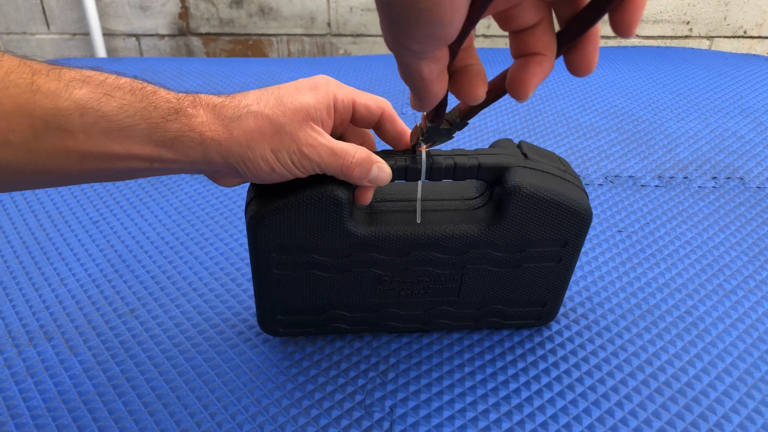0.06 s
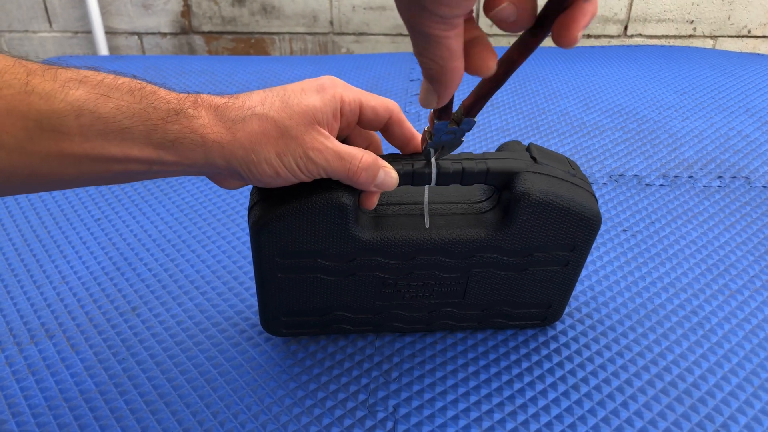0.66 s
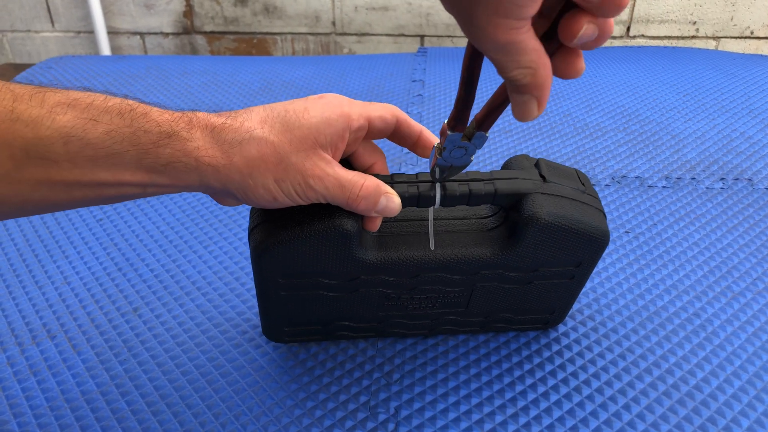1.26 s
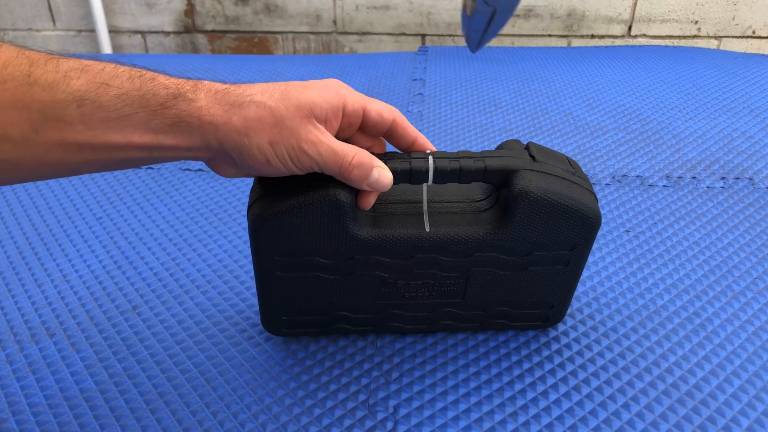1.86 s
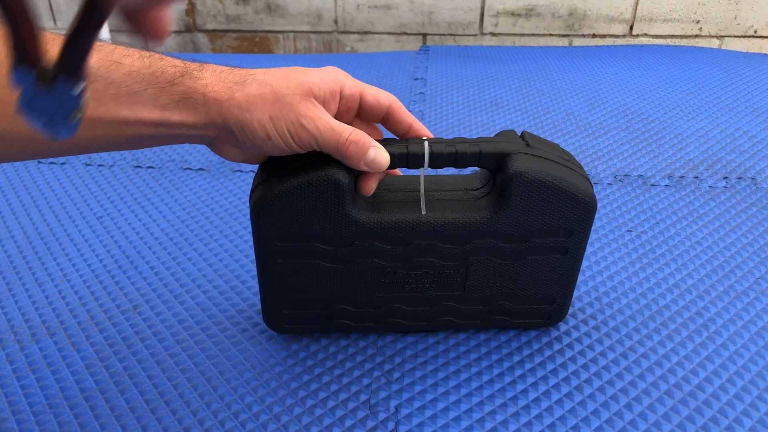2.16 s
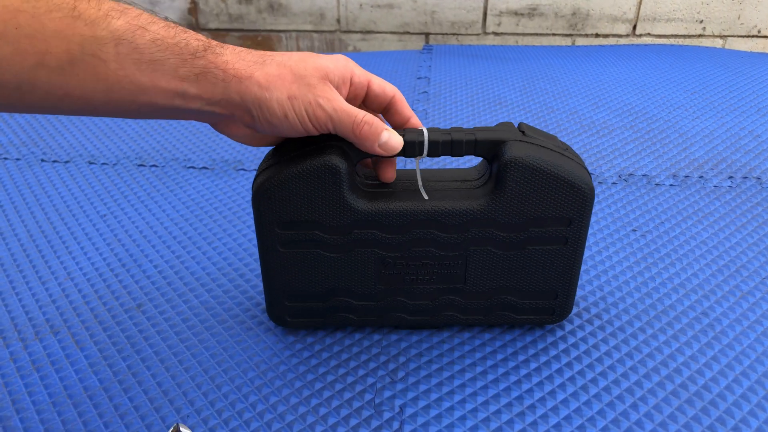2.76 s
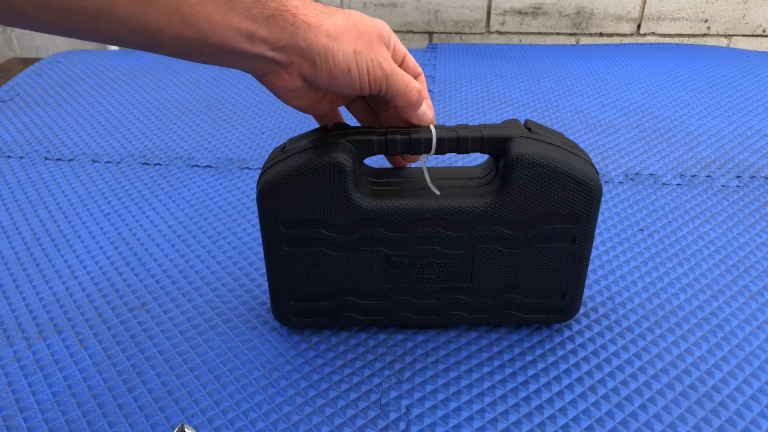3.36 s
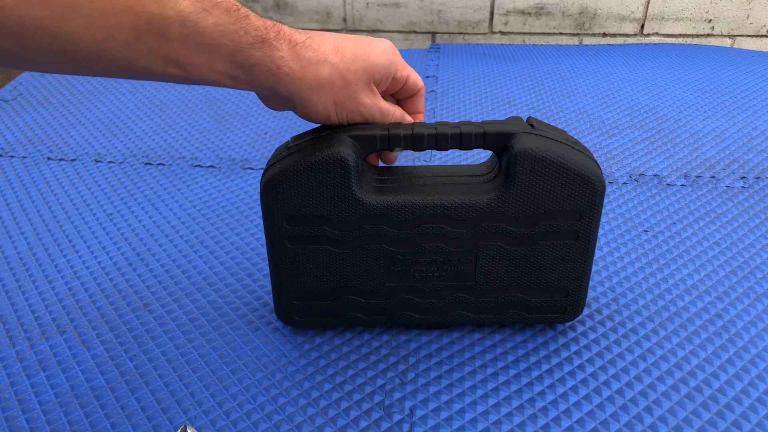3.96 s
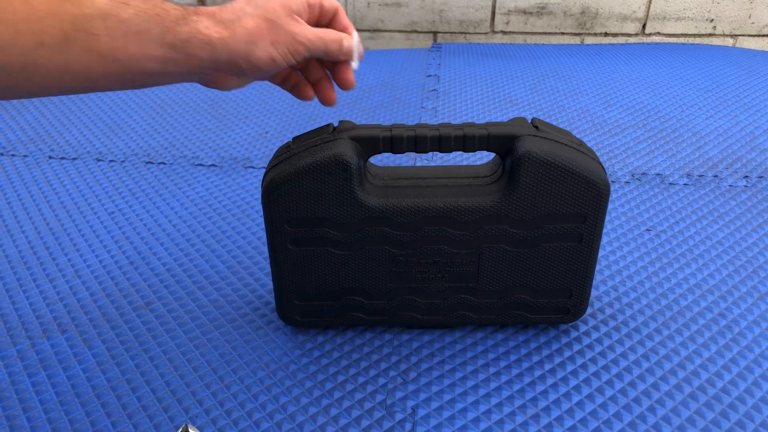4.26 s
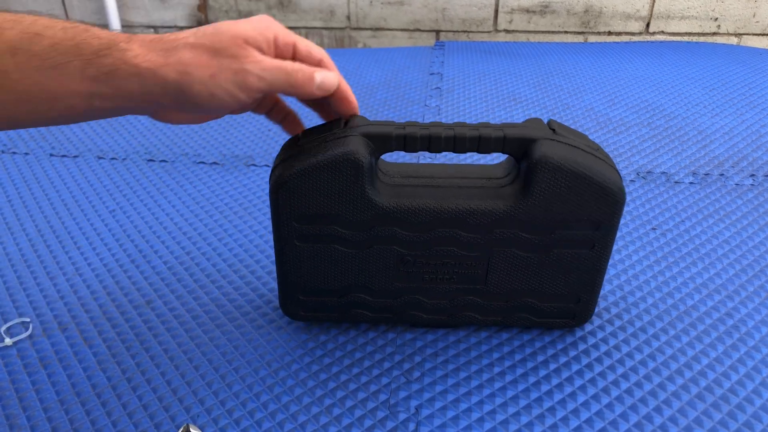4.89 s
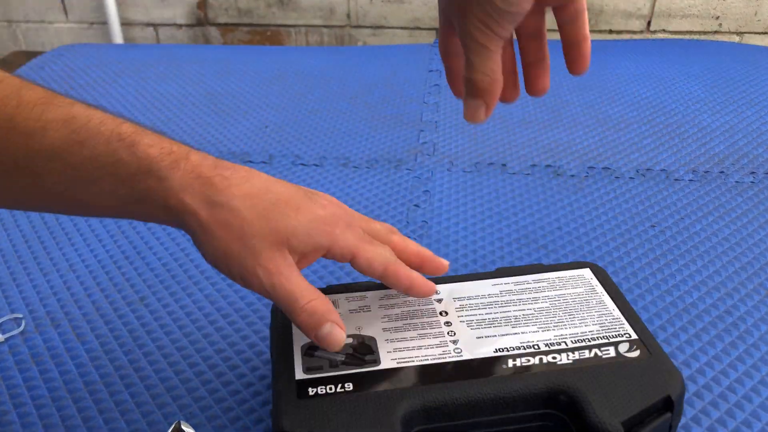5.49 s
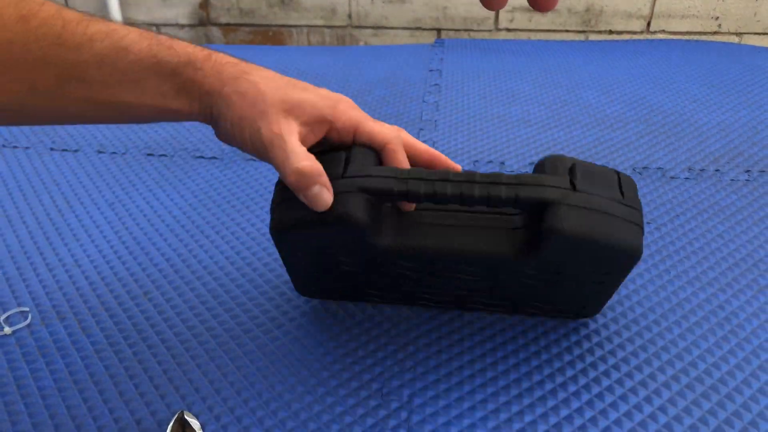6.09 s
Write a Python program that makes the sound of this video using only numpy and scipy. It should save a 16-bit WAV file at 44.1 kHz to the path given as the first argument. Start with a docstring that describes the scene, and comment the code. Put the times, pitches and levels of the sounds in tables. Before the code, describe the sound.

In a small, quiet room, faint creaks and ticks lead to a sharp crack as cutters snip a zip tie on a plastic tool case. The cutters scrape and knock down onto a foam mat. The tie clicks out of the handle and bounces away lightly. The case then tips over with a loud hollow thump, and a hand slides softly across it. Everything sounds close to the microphone.

```python
"""Faint creaks and ticks sound in a small hard-walled room as diagonal cutters grip a zip tie on a hollow
plastic tool case. The nylon parts with a crack and the steel jaws ring. The cutters scrape down onto a
foam mat; the tie clicks out of the handle and is tossed aside, where it bounces. The case tips over on
the mat, its shell booming in many modes, and a hand slides over its lid with a hiss and lifts it."""
import sys
import numpy as np
from scipy import signal
from scipy.fft import rfft, irfft, next_fast_len
from scipy.io import wavfile
from scipy.ndimage import uniform_filter1d, minimum_filter1d

SR = 44100
rng = np.random.default_rng(int(sys.argv[2]) if len(sys.argv) > 2 else 0)


def file_out(sig):
    """Save sig as 16-bit WAV at sys.argv[1]."""
    # one column per channel
    cols = np.atleast_2d(sig).T
    # limit, then scale
    lim = np.clip(cols, -1, 1)
    pcm = np.round(lim * 32767).astype(np.int16)
    wavfile.write(sys.argv[1], SR, pcm)


N = 270421
T = np.arange(SR) / SR  # one second of time [s]


def amp(db):
    """Amplitude ratio of a level: a factor of ten per 20 dB."""
    return 10 ** (np.asarray(db) / 20)


def unit(x):
    """Normalisation to rms 1."""
    return x / np.sqrt(np.mean(x ** 2) + 1e-20)


def along(points, hz):
    """Interpolation of (frequency [Hz], value) points on a logarithmic frequency axis."""
    f, v = np.transpose(points)
    return np.interp(np.log(hz + 1), np.log(f + 1), v)


def fade(t60):
    """Exponential damping, one second long, falling 60 dB in t60 seconds."""
    return np.exp(-np.log(1000) * T / np.maximum(t60, 1e-4))


def add(track, s, sound):
    """Superposition: a sound joins the track at s seconds."""
    part = track[max(round(s * SR), 0):][:len(sound)]
    part += sound[:len(part)]


def coloured(x, spectrum, tilt_db=0):
    """Minimum-phase filtering to a spectrum, tilted by tilt_db per octave above 500 Hz."""
    size = 2 * next_fast_len(len(x) // 2 + 4096)
    hz = np.fft.rfftfreq(size, 1 / SR)
    gain_db = along(spectrum, hz) + tilt_db * np.log2(np.maximum(hz, 500))
    cepstrum = irfft(np.log(amp(gain_db)))
    cepstrum[1:size // 2] *= 2  # folding onto positive time makes the filter causal
    cepstrum[size // 2 + 1:] = 0
    return irfft(rfft(x, size) * np.exp(rfft(cepstrum)))[:len(x)]


def walls():
    """Room impulse response of energy 1: after 11 ms a diffuse tail, whose bass is absorbed slowest."""
    # reverberation time: (frequency [Hz], t60 [s])
    decay_times = [(100, 0.44), (500, 0.24), (2000, 0.29), (6000, 0.28), (10000, 0.21), (15000, 0.32)]
    hz, t, noise = signal.stft(rng.standard_normal(SR // 2), SR, nperseg=256)
    decay = np.exp(-np.log(1000) * t / along(decay_times, hz)[:, None])
    tail = signal.istft(noise * decay, SR, nperseg=256)[1]
    return np.pad(tail / np.linalg.norm(tail), (round(.011 * SR), 0))


def in_room(x, wet_db):
    """Reverberation: the direct sound plus its convolution with the room's response."""
    out = amp(wet_db) * signal.fftconvolve(x, walls())
    add(out, 0, x)
    return out


def crack(spectrum, t60, wet_db, tilt_db=0):
    """Impact transient: a damped noise burst and its reverberation, filtered at constant energy."""
    envelope = fade(t60)
    burst = amp(wet_db) * np.linalg.norm(envelope) * walls()
    add(burst, 0, envelope * rng.standard_normal(SR))
    sound = coloured(burst, spectrum, tilt_db)
    return sound * np.linalg.norm(burst) / np.linalg.norm(sound)


def ring(modes, attack_s):
    """Free vibration: a sum of damped modes, at slightly new strengths for every blow."""
    tones = sum(amp(db + rng.standard_normal()) * fade(t60) * np.sin(2 * np.pi * hz * T)
                for hz, db, t60 in modes)
    return tones * (1 - fade(attack_s))


def slips(spectrum, uneven_db, tilt_db):
    """Friction noise: one second of tiny dense slips of uneven size, rms 1."""
    sizes = amp(uneven_db * np.repeat(rng.standard_normal(SR), 24)[:SR])
    return unit(coloured(sizes * rng.standard_normal(SR), spectrum, tilt_db))


def room_tone():
    """Stationary background noise: a low rumble under faint hiss."""
    # spectrum of the quiet room: (frequency [Hz], density [dB])
    air = [(12, -49), (20, -2), (120, -2.5), (146, -7.5), (277, -11), (357, -20.5), (399, -20), (513, -21),
           (825, -22.5), (976, -23.5), (1060, -28), (2670, -37), (5680, -37), (12400, -48.5), (16000, -69)]
    return amp(-48.5) * unit(coloured(rng.standard_normal(N + SR), air)[SR:])


def creaks():
    """Stick-slip friction: sparse catches excite one resonance during a short stroke."""
    # creaks of fingers, tie and case: (midpoint [s], length [s], level [dB], resonance [Hz])
    events = [(0.088, .1, -48, 660), (1.078, .081, -60, 4800), (2.819, .03, -53, 1015),
              (3.332, .12, -56.5, 1100), (3.867, .045, -44.5, 900), (3.868, .05, -42, 2350)]
    catches_per_s = 250
    out = np.zeros(N)
    for s, length, db, hz in events:
        catches = (rng.random(SR) < catches_per_s / SR) * rng.standard_normal(SR)
        body = [(hz * .14, -28), (hz * .66, -8), (hz, 0), (hz * 1.3, -8), (hz * 3, -28), (hz * 9, -45)]
        stroke = np.sin(np.pi * np.minimum(T / length, 1))
        add(out, s - length / 2, amp(db) * stroke * unit(coloured(catches, body)))
    return in_room(out, wet_db=-6)


def ticks():
    """Impulse excitation: each light contact sounds one broad resonance."""
    # tie in the jaws, tool on the case, strap flicking the handle, tie bouncing on the floor:
    # (time [s], level [dB], resonance [Hz])
    contacts = [(.149, -44, 686), (.611, -39.5, 4200), (.624, -44.5, 4150), (.641, -45, 4100),
                (.657, -36, 3860), (1.626, -49.5, 2860), (2.681, -26, 2280), (2.918, -48, 2690),
                (3.036, -42, 2850), (3.745, -37, 1000), (3.9343, -21, 2050), (3.935, -20, 740),
                (4.5377, -27, 3080), (4.597, -32, 3060), (4.6754, -44, 3200), (4.7432, -36.5, 3100)]
    out = np.zeros(N)
    for s, db, hz in contacts:
        body = [(hz * .21, -32), (hz * .6, -7), (hz, 0), (hz * 1.24, -4), (hz * 1.4, -17),
                (hz * 3, -24), (16000, -39)]
        add(out, s, amp(db - 2.5) * crack(body, t60=.019, wet_db=-10.5))
    return out


def taps():
    """Hard impact: brief contact between stiff parts spreads energy over a wide band."""
    # taps and rattles of case and cutters: (time [s], level [dB], t60 [s], tilt [dB/octave])
    impacts = [(.3589, -31, 0.023, 5.5), (.376, -39.5, 0.02, 1.5), (1.44, -45.5, .028, -2),
               (1.458, -45, 0.023, 1), (2.152, -44.5, 0.032, -0.5), (2.489, -30, .018, 1.5),
               (2.546, -15.5, 0.041, -3), (2.559, -10, 0.013, -3), (2.680, -27, 0.015, -6.5),
               (3.494, -34.5, .018, 1), (3.863, -33, .029, -5), (3.8905, -20.5, 0.0187, 3),
               (3.9125, -28, .014, 10), (3.933, -22, 0.039, -5), (4.052, -40, 0.043, -1),
               (5.132, -44, .039, .5), (5.393, -46.5, 0.018, 7), (5.3128, -12, 0.025, -0.1),
               (5.326, -28.5, 0.031, 4.5), (5.354, -34.5, .023, 4.5), (5.4095, -24, 0.011, 1.5),
               (5.603, -42, 0.022, -4)]
    # spectrum of a tap: (frequency [Hz], density [dB])
    spectrum = [(200, -14), (600, -14.5), (1000, -6.5), (1500, -10), (2300, 2), (3300, 4), (4500, -7.5),
                (6000, -9), (10000, -13.5), (15000, -33)]
    out = np.zeros(N)
    for s, db, t60, tilt_db in impacts:
        add(out, s, amp(db - 3.5) * crack(spectrum, t60, wet_db=-12.5, tilt_db=tilt_db))
    return out


def case_blows():
    """Modal response: a blow booms the hollow shell and clatters its panels; the foam adds a thud."""
    # blows on shell and mat: (time [s], boom [dB], clatter [dB], thud [dB])
    blows = [(.360, -52, -37.5, -70), (1.186, -32.5, -41, -47.5), (1.387, -55, -40, -68),
             (2.502, -49, -57, -26), (2.547, -31.5, -24, -49), (2.563, -29.5, -23, -18.5),
             (2.684, -29.5, -37, -24), (5.315, -2, -10, -12), (5.339, -36, -32, -19),
             (5.39, -49, -23.5, -48), (5.412, -22, -22, -24.5), (5.604, -46, -38.5, -42),
             (5.666, -43, -35, -35)]
    # modes of the shell: (frequency [Hz], level [dB], t60 [s])
    shell = [(102.1, -15.5, .66), (155.8, -14.5, .18), (196.9, -5.5, 0.13), (221.6, 2.5, 0.089),
             (291, -8.5, 0.11), (327.4, -17.5, 0.15), (394, -21, .18), (512, -26, 0.067), (574, -26.5, .26),
             (744.4, -29.5, 0.27), (898, -27, 0.281), (1040, -35, 0.46), (1326, -35.5, 0.25),
             (1640, -19.5, 0.1)]
    # clatter spectrum of the stiff panels: (frequency [Hz], density [dB])
    panels = [(120, -5), (280, -9), (450, 1), (900, -2), (1600, -9.5), (2300, -12), (4000, -31.5),
              (9000, -41)]
    # modes of the foam mat under a landing weight: (frequency [Hz], level [dB], t60 [s])
    mat = [(33, -17.5, 0.83), (52, -12.5, .43), (71.5, -3.5, .33), (82, -2, 0.22), (106.6, -8.5, 0.22),
           (151.6, -4.5, 0.17)]
    out = np.zeros(N)
    for s, boom_db, clatter_db, thud_db in blows:
        add(out, s, amp(boom_db) * in_room(ring(shell, attack_s=.017), wet_db=-14.5))
        add(out, s, amp(clatter_db - 3.5) * crack(panels, t60=.038, wet_db=-6))
        add(out, s, amp(thud_db) * ring(mat, attack_s=.045))
    return out


def tie_clicks():
    """Shock excitation: nylon teeth catch on edges and set the handle and the strap ringing."""
    # clicks against jaws and handle: (time [s], level [dB], t60 [s], tilt [dB/octave])
    clicks = [(.5944, -41.5, 0.021, 2), (.6473, -36, 0.014, -1), (.737, -39.5, .023, -5),
              (1.912, -42, .025, -2), (3.0229, -37.5, .029, -1.5), (3.072, -38, .016, -1),
              (3.6083, -9.5, 0.015, .5), (3.6166, -17.5, .014, -2), (3.8902, -21.5, 0.025, .5),
              (3.9116, -21.5, .01, 0.5), (3.926, -18.5, .018, 6.5), (3.933, -13, .038, -1)]
    # spectrum of a click: (frequency [Hz], density [dB])
    spectrum = [(100, -21), (300, -32), (600, -5.5), (1000, 2), (1350, -7.5), (1700, -3.5), (2300, -18),
                (3200, -1), (3900, -15), (4350, -10), (4900, -7), (5500, -5.5), (7700, -8.5), (9700, -3),
                (11800, -8.5), (13000, -2.5), (14300, -13.5), (15500, -25)]
    # modes of the hollow handle: (frequency [Hz], level [dB], t60 [s])
    handle = [(894, -16, 0.031), (1748, -28, 0.11)]
    # modes of the stiff strap: (frequency [Hz], level [dB], t60 [s])
    strap = [(1740, -16.5, 0.032), (3200, -19, 0.022), (4280, -16, 0.027), (5480, -11, 0.026),
             (5900, -19, 0.059), (8650, -21, .04), (9640, -12, 0.017), (11200, -14.5, .025)]
    out = np.zeros(N)
    for s, db, t60, tilt_db in clicks:
        add(out, s, amp(db - 7) * crack(spectrum, t60, wet_db=-12.5, tilt_db=tilt_db))
        add(out, s, amp(db - 4.5) * ring(handle, attack_s=.0032))
        add(out, s, amp(db - 6.5) * in_room(ring(strap, attack_s=.001), wet_db=-10))
    return out


def cut():
    """Fracture: the strap releases its strain at once and quivers, while the jaws clash and ring."""
    # the tie parts, then its loose end whips the handle: (time [s], level [dB], t60 [s])
    snaps = [(1.1726, 3.5, 0.0088), (1.2091, -10.5, 0.0035)]
    # spectrum of a snap: (frequency [Hz], density [dB])
    spectrum = [(300, -34.5), (600, -23.5), (950, -19.5), (1230, -5), (1500, -12.5), (2400, -10),
                (3150, -5), (3900, -9), (4800, -6.5), (5500, 2.5), (6800, -9), (8300, -0.5), (9300, 3.5),
                (11400, 0), (12200, -16.5), (16000, -27)]
    # modes of the steel jaws: (frequency [Hz], level [dB], t60 [s])
    jaws = [(5550, -5, .3), (5700, 0.5, 0.31), (8400, 0.5, .22), (8140, 1, 0.41), (8630, -7, .2),
            (9000, -1.5, 0.29), (9730, -2.5, .2), (10800, -4, .18)]
    out = np.zeros(N)
    for s, db, t60 in snaps:
        add(out, s, amp(db - 5) * crack(spectrum, t60, wet_db=-3.5))
        quiver = crack(spectrum, t60=.06, wet_db=-5.5, tilt_db=-4)
        add(out, s, amp(db - 28.5) * quiver)
        add(out, s, amp(db - 46) * ring(jaws, attack_s=.002))
    return out


def fingers():
    """Random point excitation: each fingertip catch rings a different spot of the handle."""
    # shifts of the grip: (start [s], end [s], level [dB])
    grips = [(1.361, 1.662, -68), (2.11, 2.45, -66), (2.902, 3.14, -64), (3.18, 3.84, -66),
             (4.002, 4.15, -65)]
    catches_per_s, scatter_db = 290, 2
    centre_hz, spread_octaves = 2270, .478
    t = T[:SR // 20]
    decay = fade(t60=.02)[:len(t)]
    out = np.zeros(N)
    for start, end, db in grips:
        rustle = np.zeros(round((end - start) * SR))
        catches = rng.standard_normal((round((end - start) * catches_per_s), 3))
        for i, (late, size, pitch) in enumerate(catches):
            hz = centre_hz * 2 ** (spread_octaves * pitch)
            tick = np.sin(2 * np.pi * hz * t) * decay
            add(rustle, (i + late) / catches_per_s, amp(scatter_db * size) * tick)
        add(out, start, amp(db) * unit(rustle))
    return in_room(out, wet_db=-15)


def hand_strokes():
    """Sliding friction: a rubbing hand hisses as it presses, and the hiss fades as it lifts."""
    # hand rubbing over the cutter handle and the case:
    # (start [s], length [s], level [dB], tilt [dB/octave])
    strokes = [(1.879, 0.032, -53.5, -2), (2.931, 1.2, -62, 0.6), (3.839, 0.075, -47.5, .3),
               (4.092, .035, -50.5, 1), (4.818, .11, -59, -1.8), (5.09, 0.15, -61.5, -3),
               (5.206, .06, -47.5, 1.6), (5.592, 0.11, -52, -1), (5.68, 0.15, -41.5, -0.5),
               (5.842, 0.11, -58, -5.5), (5.996, 0.043, -49.5, -0.3)]
    # spectrum of the rubbing: (frequency [Hz], density [dB])
    spectrum = [(240, -57), (400, -10.5), (826, -9), (1040, -2), (1330, -4), (1510, -4.5), (1930, -5.5),
                (3120, -2.5), (4580, -14), (10700, -14.5), (12300, -20.5), (16000, -42)]
    press_s, lift_t60_s = .024, .12
    out = np.zeros(N)
    for s, length, db, tilt_db in strokes:
        press = np.minimum(T / press_s, 1)
        lift = np.exp(-np.log(1000) * np.maximum(T - length, 0) / lift_t60_s)
        add(out, s, amp(db) * press * lift * slips(spectrum, uneven_db=3, tilt_db=tilt_db))
    return in_room(out, wet_db=-9.5)


def cutter_scrape():
    """Friction under changing load: the cutters scrape harder until they land, then slide to rest."""
    # spectrum of the cutters dragging on foam: (frequency [Hz], density [dB])
    spectrum = [(150, 0), (350, -6), (700, -11), (1200, -10.5), (2200, -4), (3800, -5.5), (5000, -11),
                (6000, -7), (7500, -16), (10500, -14.5), (16000, -43)]
    land_s, lead_s, land_db = 2.535, .5, -39
    rise_db_per_s, fall_db_per_s = 224, 76.5
    since_landing = T - lead_s
    level_db = land_db + np.minimum(rise_db_per_s * since_landing, -fall_db_per_s * since_landing)
    out = np.zeros(N)
    add(out, land_s - lead_s, amp(level_db) * slips(spectrum, uneven_db=2.5, tilt_db=1))
    return in_room(out, wet_db=-9.5)


def panel_slaps():
    """Dispersion: high bending waves travel faster, so a slap falls in pitch within milliseconds."""
    # broad panels slapping the mat: (time [s], level [dB], settled frequency [Hz], t60 [s])
    slaps = [(2.561, -27, 329, 0.14), (2.683, -32, 369, 0.068), (5.3127, -3.5, 231, 0.055),
             (5.412, -31.5, 311, 0.15)]
    first_hz = 1750
    out = np.zeros(N)
    for s, db, settled_hz, t60 in slaps:
        hz = settled_hz + (first_hz - settled_hz) * fade(t60=.01125)
        envelope = fade(t60) * (1 - fade(t60=.0043))
        flex = envelope * np.sin(2 * np.pi * np.cumsum(hz) / SR)
        add(out, s, amp(db) * in_room(flex, wet_db=-14))
    return out


def scene():
    """Superposition: the pressures of all sources add at one microphone."""
    sources = (room_tone, creaks, ticks, taps, case_blows, tie_clicks, cut, fingers, hand_strokes,
               cutter_scrape, panel_slaps)
    return sum(source()[:N] for source in sources)[None]


def record(dry):
    """Peak and band limiting: the gain dips briefly at each high peak, then the top treble is cut."""
    ceiling, window_samples, top_hz = .93, 181, 16200
    needed = np.minimum(1, ceiling / (np.abs(dry) + 1e-9))
    gain = uniform_filter1d(minimum_filter1d(needed, window_samples), window_samples)
    size = next_fast_len(N + SR)
    passband = np.fft.rfftfreq(size, 1 / SR) < top_hz
    return irfft(rfft(dry * gain, size) * passband, size)[:, :N]


dry = scene()
out = record(dry)
file_out(out)
```